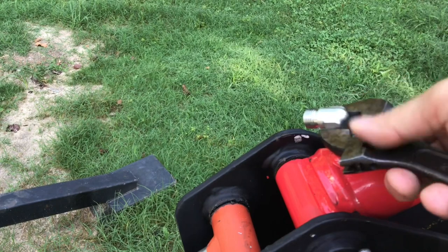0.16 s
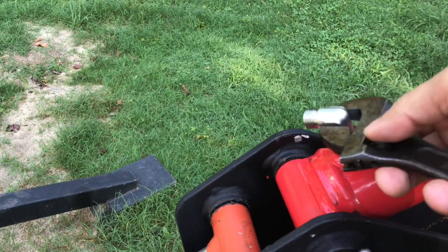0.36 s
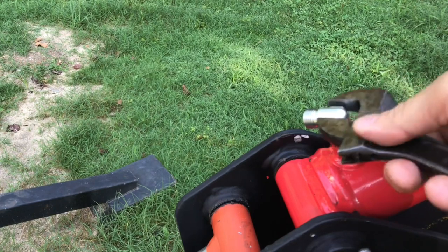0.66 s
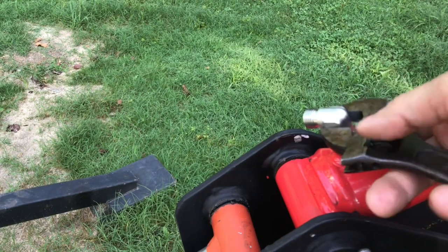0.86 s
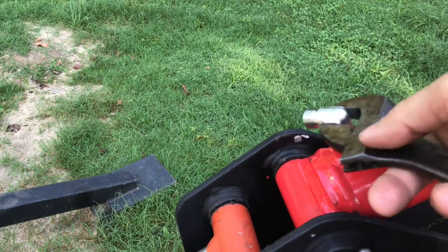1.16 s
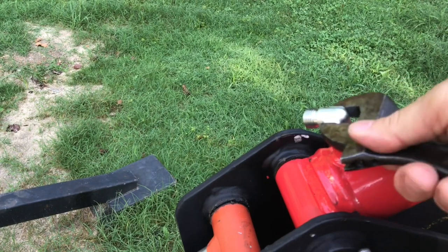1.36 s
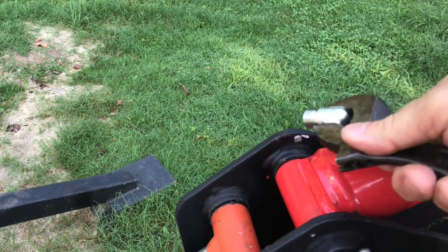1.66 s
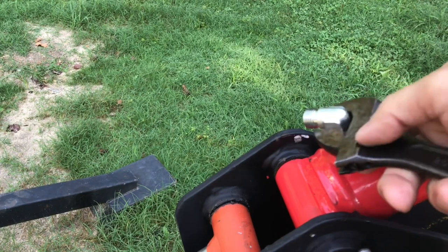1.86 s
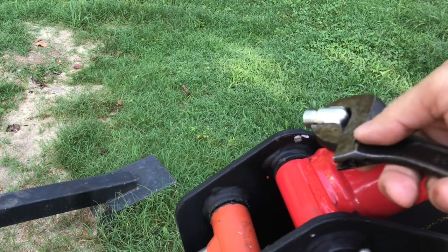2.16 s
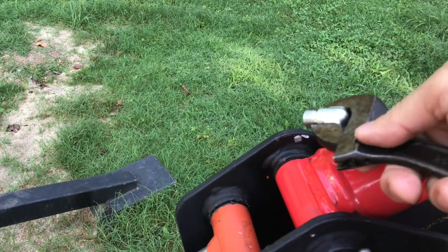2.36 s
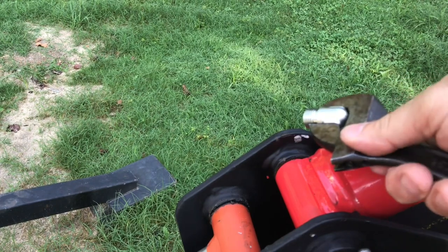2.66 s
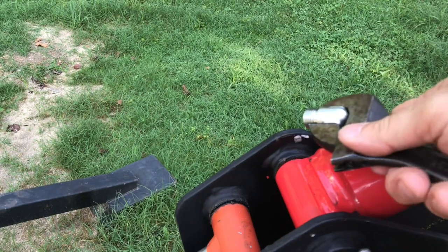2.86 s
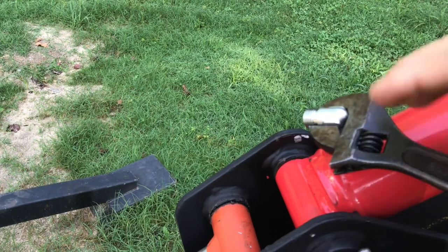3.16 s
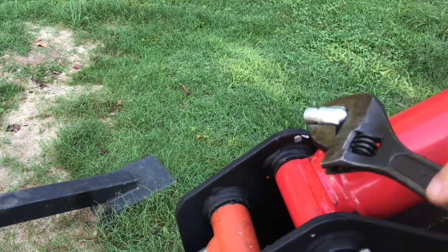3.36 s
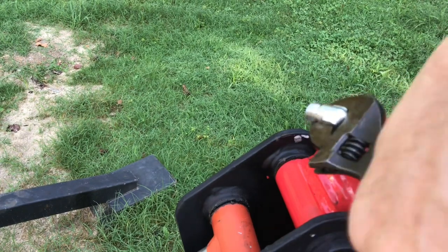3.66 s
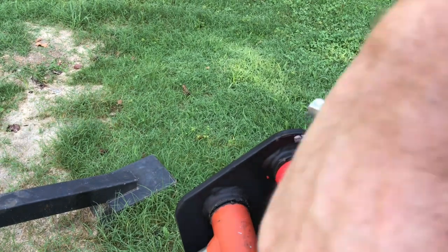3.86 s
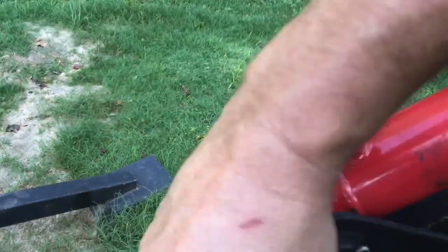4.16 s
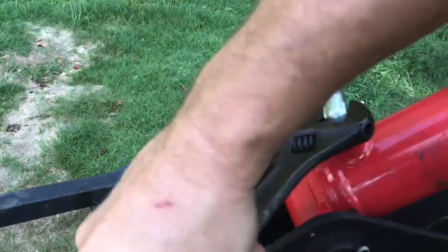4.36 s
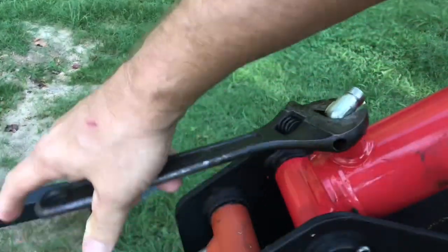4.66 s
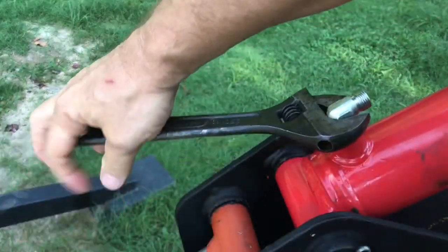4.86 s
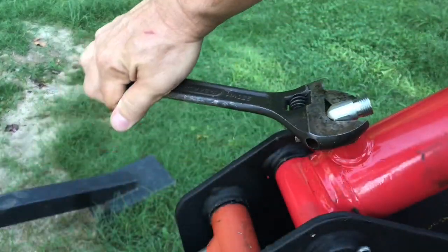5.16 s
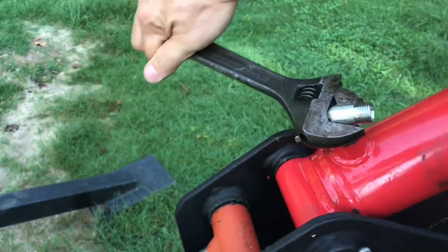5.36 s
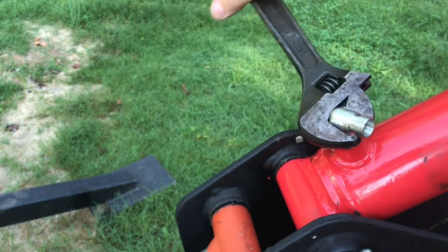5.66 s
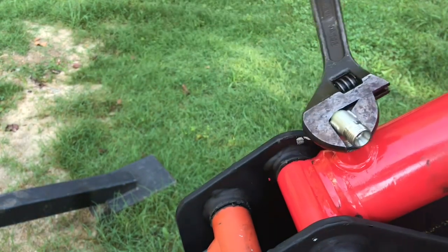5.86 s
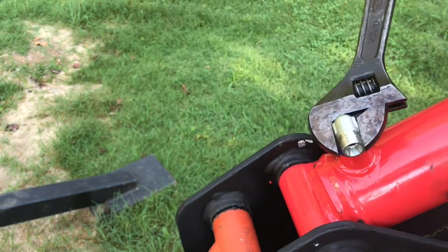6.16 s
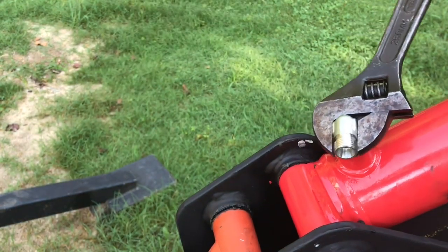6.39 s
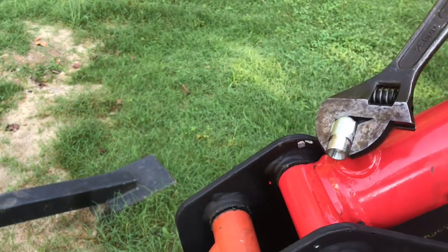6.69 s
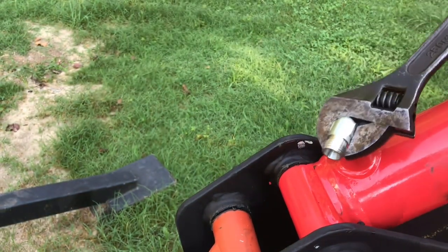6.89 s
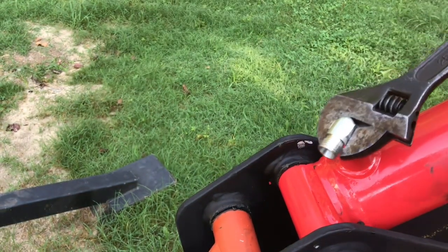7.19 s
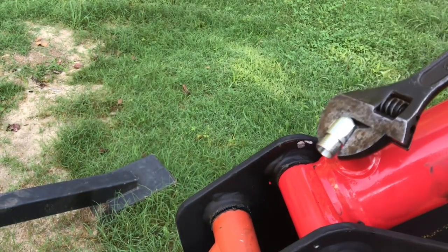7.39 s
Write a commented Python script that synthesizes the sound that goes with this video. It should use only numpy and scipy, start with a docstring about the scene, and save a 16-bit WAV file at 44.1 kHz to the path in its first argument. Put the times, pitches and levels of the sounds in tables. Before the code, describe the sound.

Loose wrench jaw ticks and clicks on a steel fitting, then one loud metallic clank with a low ring, birds and insects around.

```python
"""The loose jaw of an adjustable wrench taps on a pipe fitting, close to the microphone on an open lawn.
It knocks a steel cylinder: both ring in decaying modes under a crack of noise, and a low frame sings on.
Shaped noise makes the ticks, the grinding worm screw and the palm sliding along the handle.
Birds whistle in gliding tones, near and far, with noise-like echoes from trees and walls.
Behind them lie an insect buzz of overtones and bands of noise: traffic, hum, town, leaves and chorus."""
import sys
import numpy as np
from scipy import signal
from scipy.fft import rfft, irfft, next_fast_len
from scipy.io import wavfile

SR = 44100
rng = np.random.default_rng(int(sys.argv[2]) if len(sys.argv) > 2 else 0)


def persist_wave(psi):
    """Save psi, clipped to +-1, as 16-bit WAV."""
    counts = np.round(np.clip(psi, -1, 1) * 32767).astype(np.int16)
    wavfile.write(sys.argv[1], SR, np.atleast_2d(counts).T)


N = 332073  # length in samples

# Close taps of the loose jaw and screw: t/s, nominal peak level/dB, hardness (0 dull, 1 sharp, 2 bright)
JAW_TAPS = [(0.073, -40.5, 0.22), (0.177, -36, 0.73), (0.285, -23, 0.73), (0.461, -33.5, 1.47),
            (0.59, -32.5, 0.32), (0.681, -21, 1.95), (0.692, -44, 2.2), (0.85, -39, .1), (0.89, -36.5, .9),
            (0.932, -41, 0.76), (0.986, -30.5, .15), (1.522, -32, 0.22), (1.551, -33.5, .3),
            (1.589, -38.5, .15), (1.642, -40.5, .1), (1.769, -25, 0.83), (1.781, -26.5, 0.73),
            (1.818, -38, .2), (1.84, -45, .1), (1.89, -41.5, .3), (1.977, -26.5, 0.53), (2.028, -43.5, .15),
            (2.125, -48, .15)]
# Colour of a dull, a sharp and a bright tap: dull, middle, bright and top part, level/dB against the peak
TAP_COLOURS = [(-7, -23, -26, -30), (-17.5, -8, -23, -32), (-23.5, -13.5, -7, -28)]
# Centres of those four parts: f/Hz
TAP_PARTS_HZ = [900, 3000, 6500, 12000]
# Decay of the dense crack in each part: t60/s
TAP_CRACK_T60_S = [0.026, 0.035, 0.011, 0.014]
# Modes of the wrench: f/Hz, relative level/dB, t60/s
WRENCH_MODES = [(810, 6.5, 0.073), (882.5, 11.5, 0.047), (1102, -0.5, 0.04), (1340, 0.5, 0.046),
                (1835, -5, 0.065), (2300, -21, 0.11), (2800, -4, 0.1), (2890, -2.5, 0.11),
                (3036, -14, 0.15), (3340, -4, 0.13), (3560, -14, 0.036), (3850, -1, 0.044),
                (4670, -19, 0.061), (5600, 0.5, 0.021), (6220, -1, 0.026), (6630, 2, 0.009),
                (9440, -25, 0.0072), (11470, 8, 0.013), (13000, -15, 0.0072)]


def coloured_taps():
    """Hardness sets each tap's colour between dull, sharp and bright; the hand adds no damping."""
    taps = []
    for start_s, peak_db, hardness in JAW_TAPS:
        parts_db = [np.interp(hardness, [0, 1, 2], part) for part in np.transpose(TAP_COLOURS)]
        taps.append((start_s, peak_db, 0, *parts_db))
    return taps


def wrench():
    """Short contacts of the jaw set the steel modes of the wrench ringing."""
    return struck(coloured_taps(), TAP_PARTS_HZ, WRENCH_MODES, TAP_CRACK_T60_S, contact_s=0.0005,
                  ring_db=-7.0, crack_db=1.0, spread_db=0.5, rattle_db=11)


# Wrench against the cylinder: t/s, nominal peak level/dB, damping by the hand/(dB/s),
# then bass, dull, middle, bright and top part, level/dB against the peak
KNOCKS = [(3.466, -19.5, 470, -28, -7, -22.5, -24, -33), (4.055, -6.5, 5, -17.5, -14.5, -13.5, -33, -44),
          (6.278, -36, 300, -12, -4, -56, -30, -41)]
# Centres of those five parts: f/Hz
KNOCK_PARTS_HZ = [250, 900, 2400, 6500, 12000]
# Decay of the dense crack in each part before hand damping: t60/s
KNOCK_CRACK_T60_S = [0.07, 0.053, 0.063, 0.03, 0.1]
# Modes of the cylinder: f/Hz, relative level/dB, t60/s before hand damping
CYLINDER_MODES = [(150, 4.5, 0.14), (227, 3, 0.21), (318, -11, 0.35), (430, -23, 0.04), (533, 3.5, 0.039),
                  (618, 1.5, 0.092), (850, -18, .05), (1220, -1, 0.032), (1360, 14.5, 0.02),
                  (1686, 2, 0.084), (1783, -15, 0.16), (2080, 19, 0.0096), (2010, -4, 0.048),
                  (2210, 13, 0.03), (2280, -5.5, 0.13), (2420, -20, 0.09), (2600, -33, 0.11),
                  (2420, 2, 0.056), (2780, -5, 0.13), (2780, -14, 0.17), (3440, -7, 0.089),
                  (3510, -8, 0.14), (3460, 0, 0.069), (3670, -42, 0.041), (3864, 10, 0.023),
                  (4070, -16, 0.092), (5200, -13, 0.058), (6350, -4, 0.12), (6750, -9, 0.1)]


def cylinder():
    """Longer contacts ring the steel cylinder, and the hand damps each knock at its own rate."""
    return struck(KNOCKS, KNOCK_PARTS_HZ, CYLINDER_MODES, KNOCK_CRACK_T60_S, contact_s=0.0013,
                  ring_db=-5.5, crack_db=0.25, spread_db=1.0, rattle_db=8.0)


BUILD_CYCLES = 1.23  # time constant of a mode's build-up, in its own cycles


def struck(events, parts_hz, modes, crack_t60, contact_s, ring_db, crack_db, spread_db, rattle_db):
    """Each blow rings every mode with a strength of its own, over a crack of noise that dies part by part."""
    out, modes = np.zeros(N), np.array(modes)
    t = np.arange(int(.2 * SR)) / SR
    mode_hz, mode_t60 = modes[:, :1], modes[:, 2:]
    chance = rng.standard_normal((len(events), len(modes)))
    # The modes start nearly in step at the end of the contact
    phases = np.pi / 2 - 2 * np.pi * modes[:, 0] * 1.3 * contact_s
    phases = phases + 1.1 * rng.standard_normal(chance.shape)
    rise = 1 - np.exp(-(t / contact_s) ** 2)
    ringing = from_db(-60 * t / mode_t60) * np.exp(2j * np.pi * mode_hz * t)
    ringing *= 1 - np.exp(-(t * mode_hz / BUILD_CYCLES) ** 2)  # low modes take longer to build up
    # Loose parts touch the ringing steel and make it flutter, low modes less
    rattle = rattle_db * np.tanh(drift(250))
    settle = 1 - np.exp(-t / 0.0039)
    flutter_share = np.minimum(mode_hz / 1500, 1) * settle
    # Band edges lie midway in pitch between the part centres
    edges = np.sqrt(np.multiply([parts_hz[0] / 3, *parts_hz], [*parts_hz, 2 * parts_hz[-1]]))
    for (start_s, peak_db, damping_db, *parts_db), luck, phase in zip(events, chance, phases):
        colour_db = np.interp(np.log(modes[:, 0]), np.log(parts_hz), parts_db)
        level_db = ring_db + modes[:, 1] + colour_db + spread_db * luck
        # Each mode reads its own stretch of the rattle
        stretch = rng.integers(0, N - len(t), (len(modes), 1)) + np.arange(len(t))
        flutter = from_db(flutter_share * rattle[stretch])
        rings = ((from_db(level_db) * np.exp(1j * phase)) @ (ringing * flutter)).imag
        noise = rng.standard_normal(len(t))
        crack = sum(from_db(crack_db + part_db - 60 * t / t60) * band(noise, low, high)
                    for part_db, t60, low, high in zip(parts_db, crack_t60, edges, edges[1:]))
        blow = from_db(peak_db - damping_db * t) * rise * (rings + crack)
        at = round(start_s * SR)
        out[at:at + len(t)] += blow[:N - at]
    return out


# Low ring after the big knock: f/Hz, level/dB, t60/s
FRAME_MODES = [(238.5, -39.5, 1.37), (331, -52, 0.72)]
FRAME_STRUCK_S, FRAME_DAMPED_S = 4.056, 4.31


def frame():
    """Low modes of the frame swell in and sing on until a touch damps them."""
    t = np.maximum(np.arange(N) / SR - FRAME_STRUCK_S, 0)
    damping_db = -700 * np.maximum(t - FRAME_DAMPED_S + FRAME_STRUCK_S, 0)
    rings = sum(from_db(level_db - 60 * t / t60) * np.sin(2 * np.pi * hz * t)
                for hz, level_db, t60 in FRAME_MODES)
    return np.clip(t / 0.09, 0, 1) * from_db(damping_db) * rings


# Small dry ticks of grip, thread and grass: t/s, nominal peak level/dB, centre f/Hz, width/octaves
TICKS = [(.637, -51, 12000, 1), (1.0, -48, 12000, 1), (4.814, -32, 1210, 0.63), (4.845, -47, 1800, 1.2),
         (4.918, -52, 8800, .6), (4.985, -46, 5000, 3), (4.993, -38.5, 1780, 2.1), (5.008, -41, 950, 0.71),
         (5.025, -34.5, 1660, 0.93), (5.066, -49, 900, .6), (5.135, -41.5, 1410, 0.56),
         (5.162, -45, 1010, 1.2), (5.242, -46, 3950, 2.6), (5.34, -53, 9000, 2.2), (5.371, -49, 5000, 3),
         (5.478, -47, 6000, 3), (5.692, -54, 8500, 1), (6.046, -54, 11000, 1), (6.19, -37.5, 10000, 1.8),
         (6.23, -46, 11500, 1.2), (6.662, -52, 12000, 1)]
TICK_T60_S, TICK_SHORTENS = 0.044, 0.36  # t60 at 1 kHz; higher ticks die faster by this power of pitch


def ticks():
    """Each tick is a puff of band noise with a sudden start and a quick decay."""
    out, t = np.zeros(N), np.arange(int(.06 * SR)) / SR
    for start_s, peak_db, hz, octaves in TICKS:
        half_width = 2 ** (octaves / 2)
        puff = band(rng.standard_normal(len(t)), hz / half_width, hz * half_width)
        t60 = TICK_T60_S * (1000 / hz) ** TICK_SHORTENS
        envelope = from_db(peak_db - 7 - 60 * t / t60) * np.minimum(t / 0.00042, 1)  # 7 dB for noise peaks
        at = round(start_s * SR)
        out[at:at + len(t)] += envelope * puff
    return out


# Worm screw grinding under the thumb: start t/s, hold t/s, level/dB
SCREW_TURNS = [(1.51, 0.1, -54), (1.83, 0.011, -55), (1.9, .1, -66)]
# Colour of the grinding: f/Hz, relative level/dB per Hz
SCREW_COLOUR = [(600, -23), (780, -2), (900, 2), (1100, -3), (1400, -36), (2000, -18), (3000, -19),
                (4500, -21)]


def screw():
    """The thread slips in uneven little jerks: flickering noise coloured by the wrench's dull modes."""
    turns = strokes(SCREW_TURNS, rise_db_s=250, fall_db_s=250)
    return turns * from_db(3.3 * drift(50)) * coloured(SCREW_COLOUR)


# Palm along the handle: t/s, body level/dB, treble level/dB
PALM_SLIDE = [(4.5, -85, -80), (4.66, -70, -67), (4.702, -62, -59), (4.74, -53, -53), (4.78, -53.5, -48),
              (4.85, -48, -50.5), (4.888, -70, -60.5), (5.004, -59, -65.5), (5.22, -73, -71)]
# Colour of the slide's body: f/Hz, relative level/dB per Hz
SLIDE_COLOUR = [(530, -42), (900, -12), (1210, -1), (1420, -8), (1560, -1.5), (3540, -8), (3910, -9),
                (7140, -7), (9500, -18), (12400, -44), (20900, -120)]
# Skin and cloth brushing past: start t/s, hold t/s, level/dB
BRUSHES = [(0, .01, -66), (.635, .03, -66), (.69, 0.018, -60.5), (.955, 0.043, -67), (1.245, .01, -69),
           (1.355, .04, -73), (2.51, .02, -68), (2.64, .02, -71), (3.05, .12, -71), (3.19, 0.043, -59.5),
           (3.41, .05, -72), (3.505, .01, -67), (3.70, .015, -68), (3.775, .005, -69), (4.135, .01, -79),
           (5.27, 0.11, -68.5), (5.58, 0.21, -72)]
# Colour of the brushing and the slide's treble: f/Hz, relative level/dB per Hz
RUB_COLOUR = [(4710, -2), (8000, -5), (10600, -6.5), (14500, -3.5), (15200, -3.5), (15800, -17)]
# Skin squeak on steel: t/s, f/Hz, level/dB
SQUEAK = [(4.65, 7068, -70), (4.67, 7240, -55.5), (4.86, 7300, -58)]


def rubbing():
    """Dry skin on steel: fine grains of noise whose level flickers, and a thin stick-slip squeak."""
    grain = from_db(1.4 * drift(60))
    body_db, treble_db = in_time(PALM_SLIDE)
    brushing = strokes(BRUSHES, rise_db_s=400, fall_db_s=250)
    brushing = np.hypot(brushing, from_db(-73.5))  # a steady rustle lies under the brushes
    hiss = np.hypot(brushing, while_on(PALM_SLIDE) * from_db(treble_db)) * coloured(RUB_COLOUR)
    slide = while_on(PALM_SLIDE) * from_db(body_db) * coloured(SLIDE_COLOUR)
    hz, squeak_db = in_time(SQUEAK)
    tone = np.sin(2 * np.pi * np.cumsum(hz + 90 * drift(54)) / SR)
    squeak = while_on(SQUEAK) * from_db(squeak_db + 4.4 * drift(40)) * tone
    return grain * (hiss + slide) + squeak


# All four bird shapes: note length t/s, start and end pitch as shares off the top,
# held after-note length t/s, its starting level/dB against the note
# A near bird, each call swooping up from below: t/s, top f/Hz, level/dB
SWOOPS = [(0.055, 3190, -48.5), (3.316, 3190, -49.5), (3.403, 3190, -49.5)]
SWOOP_SHAPE = (.036, -.2, -.004, .22, -9)
# A second near bird, arched notes at an even pace, sinking a little: t/s, top f/Hz, level/dB
SONG = [(5.214, 3580, -53), (5.522, 3570, -53.5), (5.812, 3540, -50.5), (6.095, 3470, -55)]
SONG_SHAPE = (.047, -.075, -.03, .16, -15)
# Farther birds, short level notes; the first row is the fading echo of a near bird's call:
# t/s, f/Hz, level/dB
TWITTER = [(0, 3110, -55), (5.1, 4480, -58), (5.18, 4480, -60), (5.211, 4110, -58), (5.349, 4600, -59),
           (5.354, 4140, -54), (5.44, 4800, -59), (5.46, 4310, -63), (5.595, 4620, -61), (5.72, 4120, -61),
           (5.865, 3900, -63), (6.285, 4660, -59), (6.35, 3170, -60), (6.428, 4360, -57), (6.46, 3170, -64),
           (6.575, 4570, -60), (6.578, 4070, -63), (6.676, 3690, -55), (6.685, 3030, -62),
           (6.723, 3760, -52.5), (6.818, 3655, -59)]
TWITTER_SHAPE = (.043, -.018, -.004, .05, -8)
# A low faint far whistle: t/s, f/Hz, level/dB
PIPING = [(3.575, 2025, -73), (3.748, 2070, -80), (4.515, 2010, -72)]
PIPING_SHAPE = (.11, -.02, .012, .05, -9)
# Blurred chatter of a far flock: t/s, centre f/Hz, level/dB
CHATTER = [(6.62, 3655, -70), (6.69, 3647, -54.5), (6.8, 3683, -62), (6.92, 3550, -61), (7.05, 3460, -71),
           (7.18, 3140, -65.5), (7.3, 2910, -68), (7.45, 2770, -68)]
# Colour of the echoes, leaves swallow higher notes: f/Hz, relative level/dB
ECHO_COLOUR = [(1500, 6), (3250, -5), (3500, -6), (5000, -8), (8000, -20)]
# Fainter notes fall at random: span in s and Hz, loudest level in dB, count
FLOCK_S, FLOCK_HZ, FLOCK_DB, FLOCK_NOTES = (5.0, 6.7), (3850, 4750), -66, 36
# Scatter from trees and walls; far sounds lose direct sound
ECHO_DB, ECHO_T60_S, FAR_DIRECT_DB = -8, 0.91, -1.5


def flock_notes():
    """Faint far notes, each at a random time within its own equal slot, with random pitch and level."""
    notes = []
    for slot, (late, high, faint) in enumerate(rng.random((FLOCK_NOTES, 3))):
        start_s = np.interp(slot + late, [0, FLOCK_NOTES], FLOCK_S)
        notes.append((start_s, np.interp(high, [0, 1], FLOCK_HZ), FLOCK_DB - 4 * faint))
    return notes


def chatter():
    """Many far voices smear into one rough band: a tone with fast random pitch and level."""
    hz, level_db = in_time(CHATTER)
    warble = np.sin(2 * np.pi * np.cumsum(hz + 170 * drift(129.3)) / SR)
    return while_on(CHATTER) * from_db(level_db + 4.8 * drift(25)) * warble


def birds():
    """Short whistles of several birds; the air makes them flutter, echoes scatter after."""
    waver = 1 + 0.0059 * drift(77)
    near = whistles(SWOOPS, SWOOP_SHAPE, waver) + whistles(SONG, SONG_SHAPE, waver)
    near = near * from_db(2.8 * drift(57))
    # The first twitter row, an echo of a near call, goes with the far sounds
    far = whistles(TWITTER + flock_notes(), TWITTER_SHAPE, waver)
    far = far + whistles(PIPING, PIPING_SHAPE, waver)
    far = far * from_db(2.8 * drift(60)) + chatter()
    t = np.arange(SR) / SR
    scatter = coloured(ECHO_COLOUR)[:SR] * from_db(-60 * t / ECHO_T60_S) * np.clip(t / 0.0045, 0, 1)
    scatter = scatter / np.sqrt(np.sum(scatter ** 2))
    echoes = signal.fftconvolve(near + far, scatter)[:N]
    return near + from_db(FAR_DIRECT_DB) * far + from_db(ECHO_DB) * echoes


def whistles(notes, shape, waver):
    """A note glides to its top pitch by halfway, bends to its end pitch, then holds the top, quiet and fading."""
    out, (length, start, end, held, held_db) = np.zeros(N), shape
    u, v = np.linspace(0, 1, int(length * SR)), np.linspace(0, 1, int(held * SR))
    bend = 1 + start * np.clip(1 - u / .5, 0, 1) ** 2 + end * np.clip(u / .5 - 1, 0, 1) ** 2
    glide = np.append(bend, np.ones(len(v)))
    note_swell = np.abs(np.sin(np.pi * u)) ** 0.27
    held_swell = from_db(held_db - 11 * v) * np.abs(np.sin(np.pi * v)) ** 0.23
    swell = np.append(note_swell, held_swell)
    for start_s, top_hz, level_db in notes:
        at = round(start_s * SR)
        phase = 2 * np.pi * np.cumsum(top_hz * glide * waver[at:at + len(glide)]) / SR
        out[at:at + len(glide)] += from_db(level_db) * swell * np.sin(phase)
    return out


# Overtones of the insect buzz: overtone number, relative level/dB
BUZZ_OVERTONES = [(18, -5), (22, -18), (23, -9), (24, -9.5), (26, -4.5), (27, -9), (28, -2.5), (29, -6),
                  (30, -17), (31, -3), (32, -21), (33, -5), (35, -4.5), (36, -16), (37, -12)]
# The buzz over time: t/s, level/dB before a 2 dB cut
BUZZ_LEVEL = [(0, -69.5), (1, -65.5), (2.5, -65.5), (3.5, -67), (4.5, -72), (5.5, -93), (7.53, -112)]


def buzz():
    """Thin overtones of one 256 Hz pulse rate, each swelling and fading with the moving air."""
    phase = 2 * np.pi * np.cumsum(256.0 + 0.079 * drift(1.4)) / SR
    tones = np.zeros(N)
    for overtone, level_db in BUZZ_OVERTONES:
        tone = np.sin(round(overtone) * phase + rng.uniform(0, 2 * np.pi))
        tones += from_db(level_db + 2.3 * drift(2.3)) * tone
    return from_db(in_time(BUZZ_LEVEL)[0] - 2.0) * tones


# Far machinery: f/Hz, width f/Hz, relative level/dB
HUM_BANDS = [(125, 12, -4), (136.5, 12.8, -7.5), (648, 8, -22), (912, 49, -20)]


def hum():
    """Noise through narrow resonances: a hum that wavers."""
    out = np.zeros(N)
    for hz, width_hz, level_db in HUM_BANDS:
        r = np.exp(-np.pi * width_hz / SR)
        poles = [1, -2 * r * np.cos(2 * np.pi * hz / SR), r * r]
        out += from_db(level_db) * rms_one(signal.lfilter([1, 0, -1], poles, rng.standard_normal(N)))
    return out


# Background: t/s, then level/dB of traffic rumble, hum, far town and leaves, insect chorus, upper chorus
AIR_LEVELS = [(0.0, -49.5, -50, -58, -62.5, -66), (0.44, -49.5, -57, -56.5, -64, -72),
              (3.0, -51.5, -53, -57.5, -61, -68.5), (4.63, -51, -48.5, -58, -61.5, -70.5),
              (4.91, -48.5, -48.5, -55.5, -60, -74), (5.43, -48.5, -49, -57.5, -60.5, -70),
              (6.46, -49, -53.5, -56.5, -61.5, -72.5), (6.9, -48, -51, -57.5, -58.5, -76),
              (7.53, -51.5, -49, -57, -62.5, -80)]
# Colours of traffic, town and leaves, and both insect bands: f/Hz, relative level/dB per Hz
RUMBLE_COLOUR = [(13, -73), (22, -21), (43, -2.5), (64, 7), (91, 1.5), (124, 1), (146, -13), (205, -19),
                 (260, -36.5), (340, -53), (570, -120)]
TOWN_COLOUR = [(120, -10), (200, -1), (254, -5.5), (311, -4.5), (555, -13), (628, -9.5), (736, -14),
               (1050, -10), (1760, -19.5), (2020, -19), (3000, -26.5), (3900, -50), (6600, -120)]
CHORUS_COLOUR = [(1410, -21), (2400, -4.5), (3150, -2), (3450, -0.5), (4460, -1), (4960, -3.5), (5820, 0.5),
                 (8000, -18), (10400, -29), (17600, -120)]
UPPER_COLOUR = [(4120, -21), (7000, 0.5), (7430, -5), (7780, -4), (9190, -2.5), (10800, -18), (14000, -30),
                (22000, -120)]


def background():
    """Rumble, hum, town noise and two bands of insect chorus, each following its own level curve."""
    rumble_db, hum_db, town_db, chorus_db, upper_db = in_time(AIR_LEVELS)
    rumble = from_db(rumble_db) * coloured(RUMBLE_COLOUR)
    machinery = from_db(hum_db) * hum()
    town = from_db(town_db + 0.12 * drift(27)) * coloured(TOWN_COLOUR)
    chorus = from_db(chorus_db + 1.2 * drift(2.7)) * coloured(CHORUS_COLOUR)
    upper = from_db(upper_db + 1.8 * drift(9.8)) * coloured(UPPER_COLOUR)
    return rumble + machinery + town + chorus + upper


def from_db(db):
    """Decibels to gain."""
    return np.exp(np.asarray(db) * np.log(10) / 20)


def rms_one(x):
    """Scale to rms 1."""
    return x / np.sqrt(np.mean(x ** 2) + 1e-20)


def in_time(rows):
    """Columns of a curve, sample by sample."""
    times_s, *columns = np.transpose(rows)
    return [np.interp(np.arange(N) / SR, times_s, column) for column in columns]


def while_on(rows):
    """One during a curve, fading to zero at its ends."""
    t = np.arange(N) / SR
    return np.clip(np.minimum(t - rows[0][0], rows[-1][0] - t) / .01, 0, 1)


def strokes(rows, rise_db_s, fall_db_s):
    """Gain of a run of strokes, each rising, holding and falling; overlaps add as power."""
    t, power = np.arange(N) / SR, np.zeros(N)
    for start_s, hold_s, level_db in rows:
        before, after = np.maximum(start_s - t, 0), np.maximum(t - start_s - hold_s, 0)
        power += from_db(level_db - rise_db_s * before - fall_db_s * after) ** 2
    return np.sqrt(power)


def drift(rate_hz):
    """Slow chance: noise through a double one-pole low-pass; rms 1."""
    step = 40  # samples between the computed points
    r = np.exp(-2 * np.pi * rate_hz * step / SR)
    slow = signal.lfilter([1], [1, -2 * r, r * r], rng.standard_normal(N // step + 2002))
    slow = slow[2000:]  # skip the filter's start
    return np.interp(np.arange(N) / step, np.arange(len(slow)), rms_one(slow))


def coloured(spectrum):
    """Noise with the given spectrum, at -90 dB outside it before scaling to rms 1."""
    size = next_fast_len(N)
    hz = np.maximum(np.fft.rfftfreq(size, 1 / SR), 1)
    points = np.array(spectrum)
    shape_db = np.interp(np.log(hz), np.log(points[:, 0]), points[:, 1], left=-90, right=-90)
    return rms_one(irfft(rfft(rng.standard_normal(size)) * from_db(shape_db), size)[:N])


def band(x, low_hz, high_hz):
    """Steep band-pass; rms 1."""
    edges_hz = [low_hz, min(high_hz, .45 * SR)]
    return rms_one(signal.sosfilt(signal.butter(5, edges_hz, "band", fs=SR, output="sos"), x))


def scene():
    """All sources at one microphone."""
    steel = wrench() + cylinder() + frame()
    hand = ticks() + screw() + rubbing()
    return (steel + hand + birds() + buzz() + background())[None]


def record(dry):
    """A steep low-pass cuts the top, 60 dB down from 16130 Hz."""
    return signal.sosfilt(signal.cheby2(14, 60, 16130, fs=SR, output="sos"), dry)


dry = scene()
out = record(dry)
persist_wave(out)
```